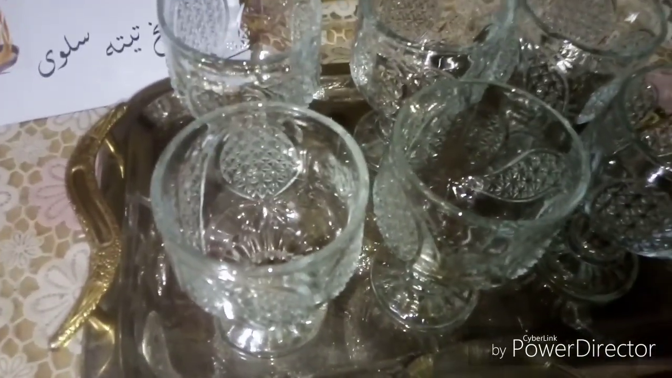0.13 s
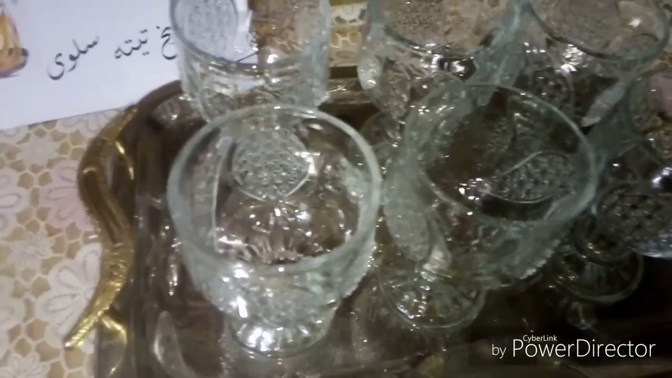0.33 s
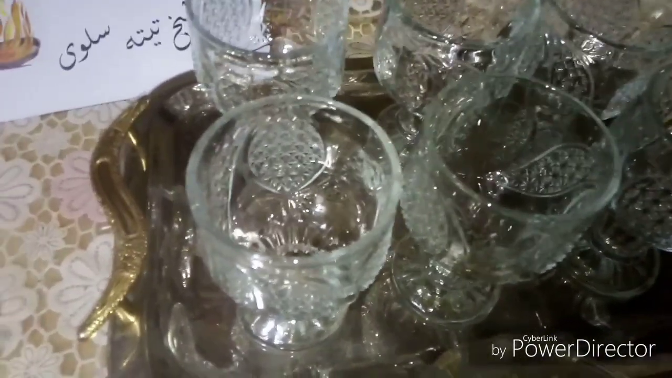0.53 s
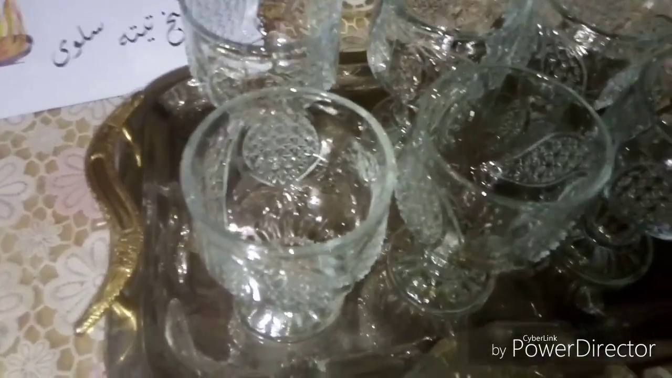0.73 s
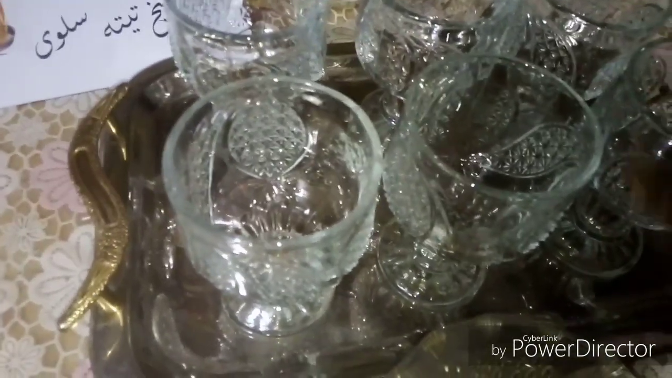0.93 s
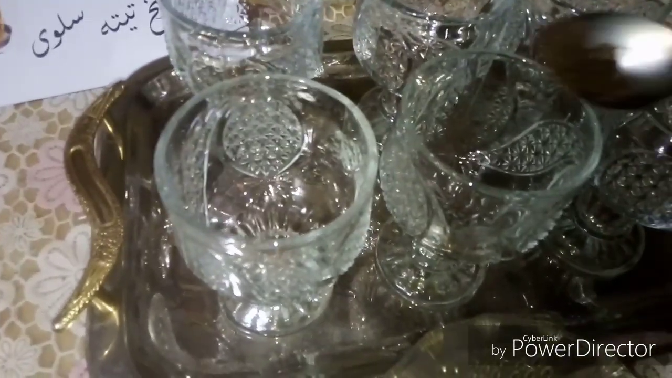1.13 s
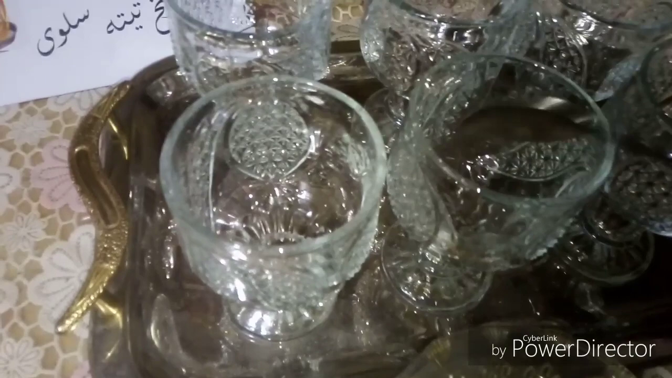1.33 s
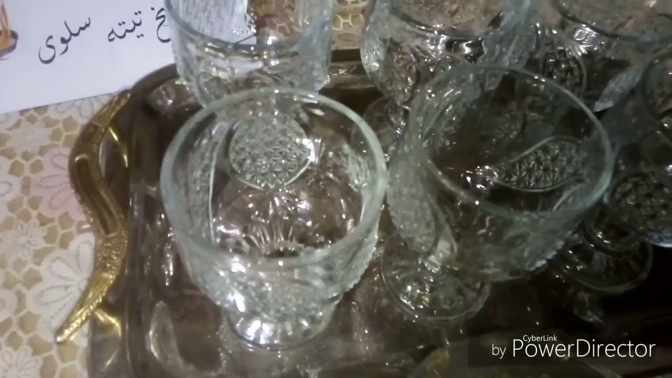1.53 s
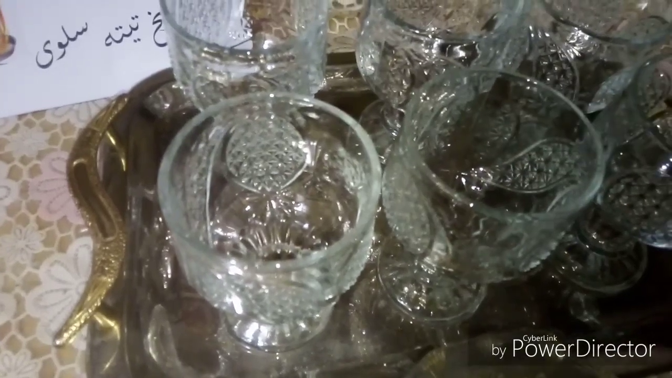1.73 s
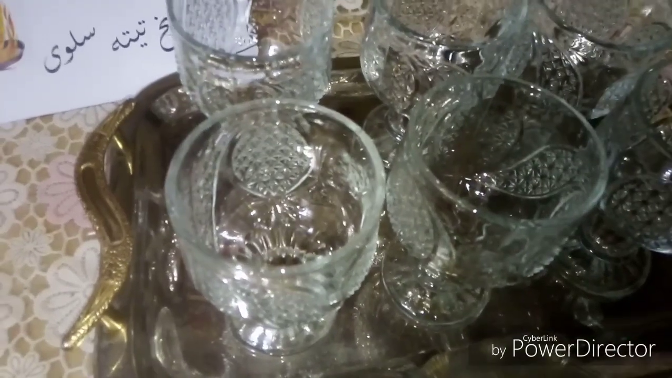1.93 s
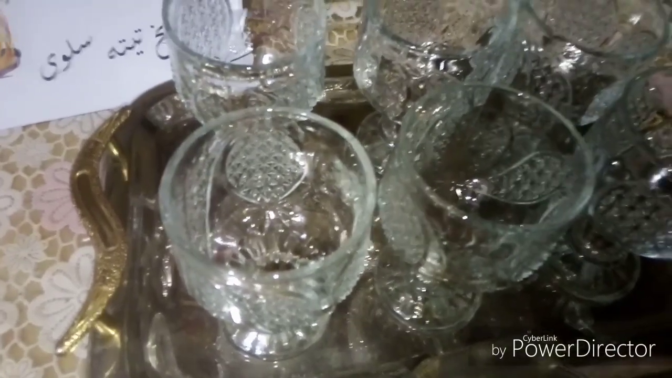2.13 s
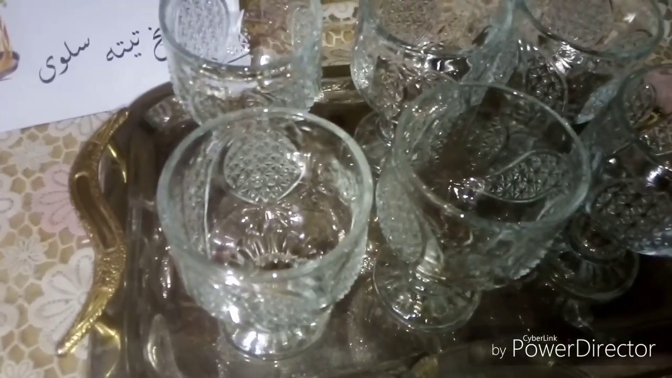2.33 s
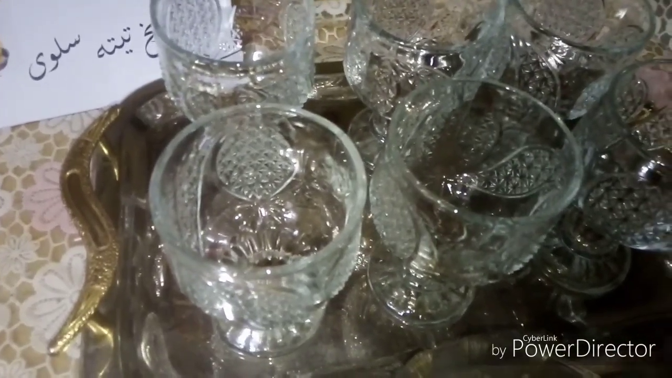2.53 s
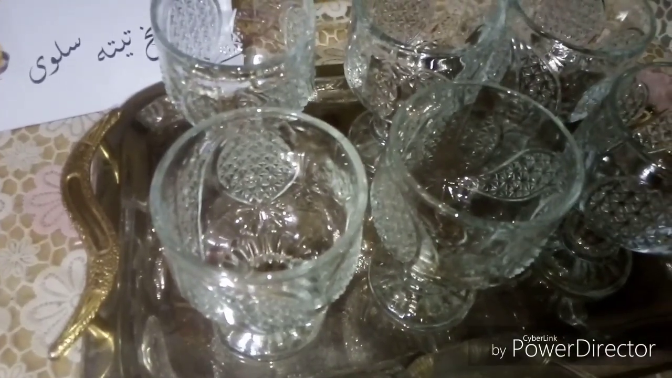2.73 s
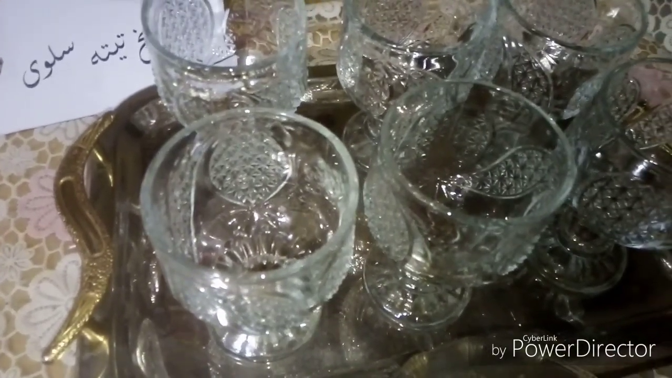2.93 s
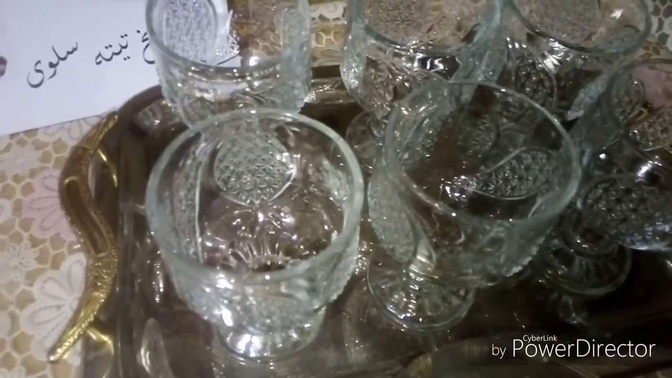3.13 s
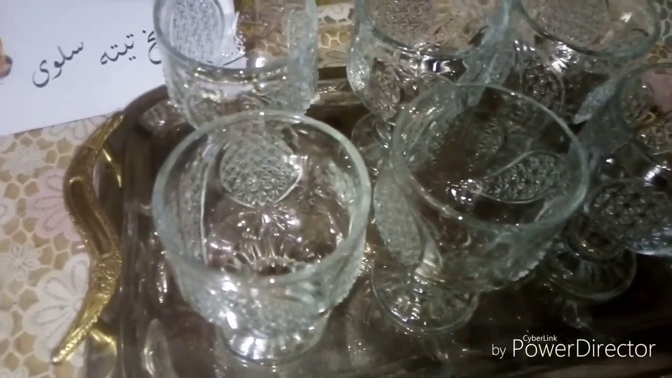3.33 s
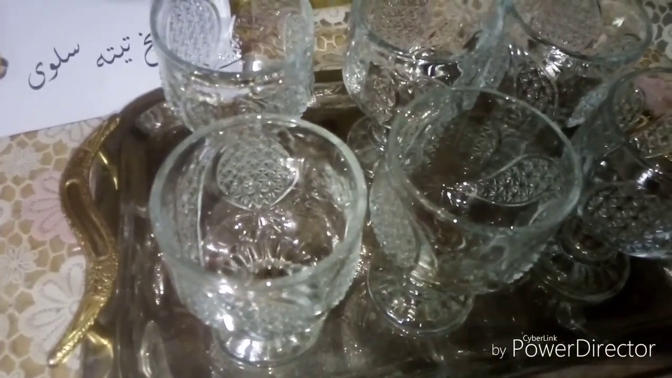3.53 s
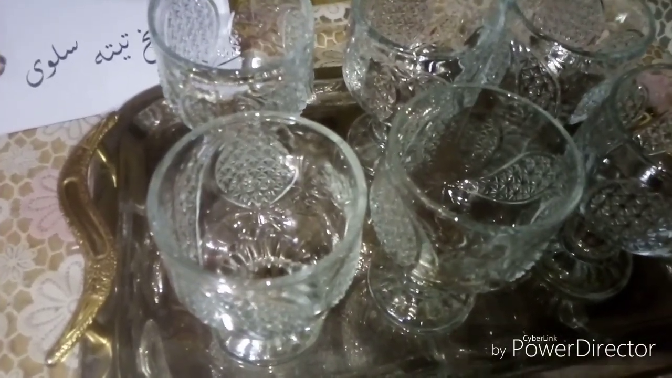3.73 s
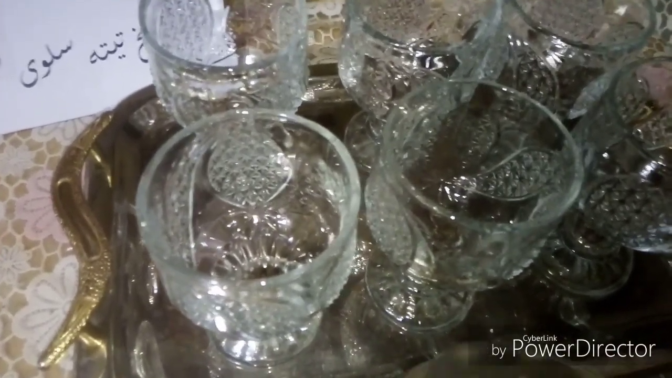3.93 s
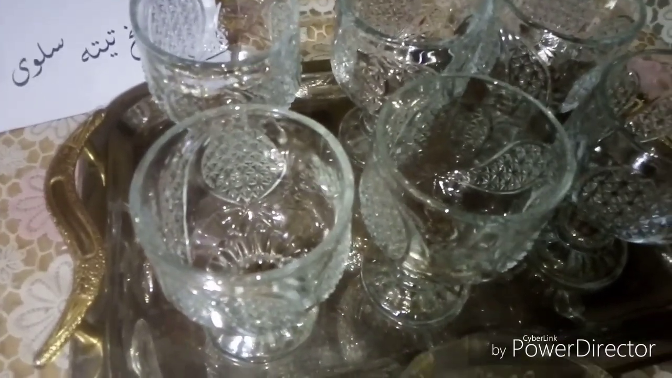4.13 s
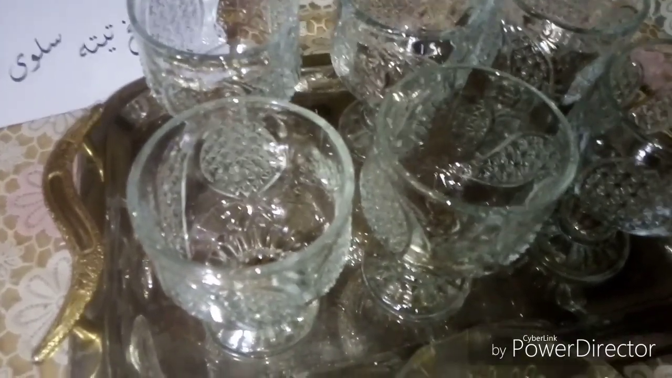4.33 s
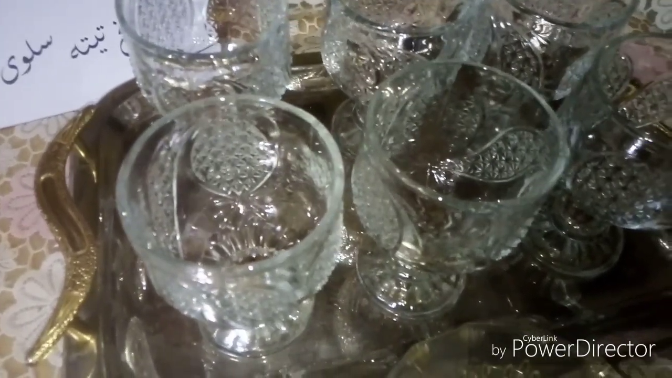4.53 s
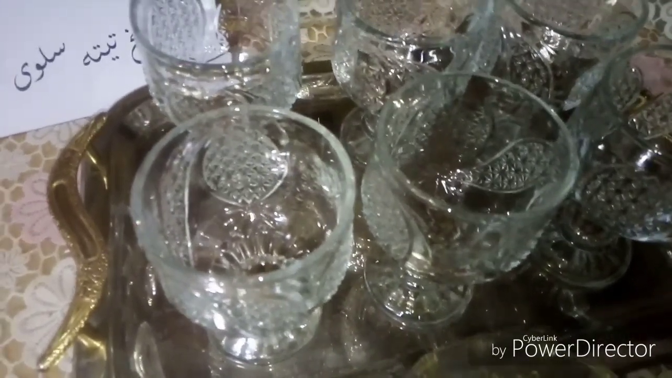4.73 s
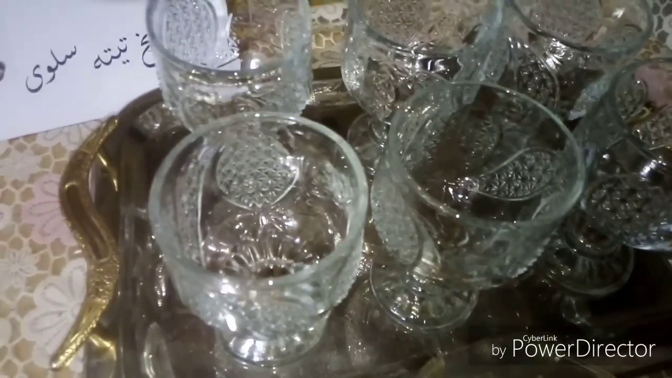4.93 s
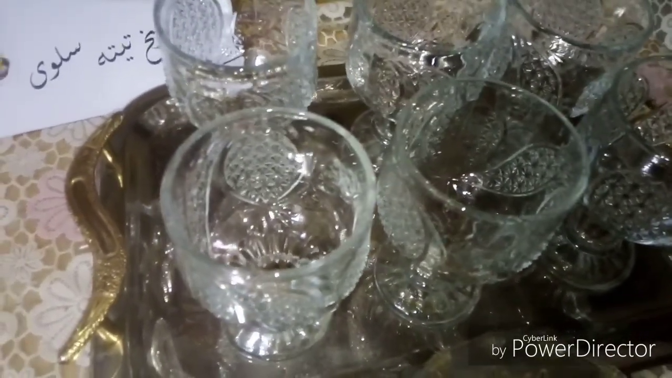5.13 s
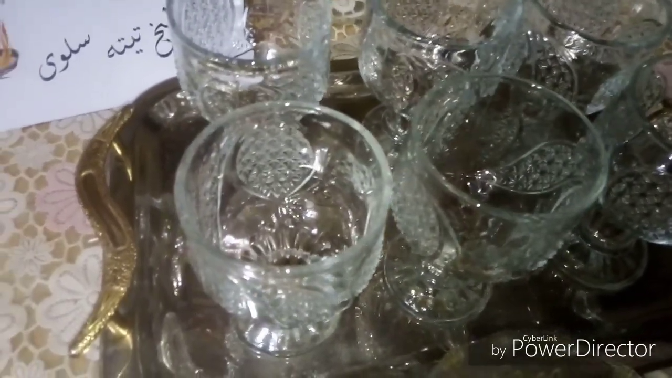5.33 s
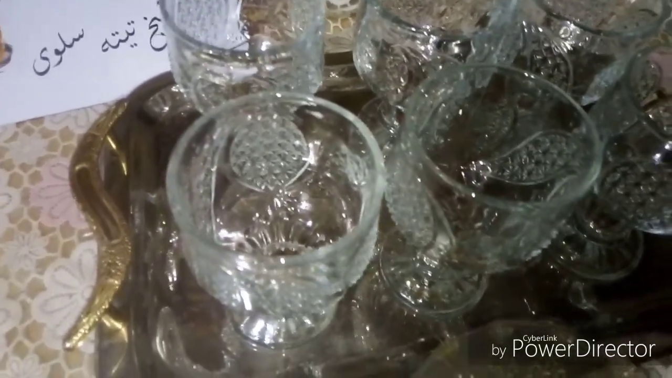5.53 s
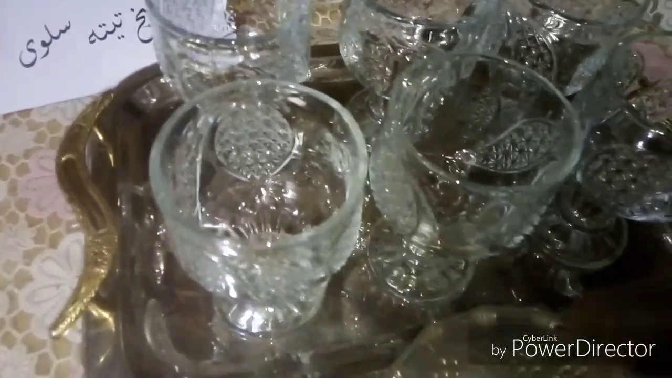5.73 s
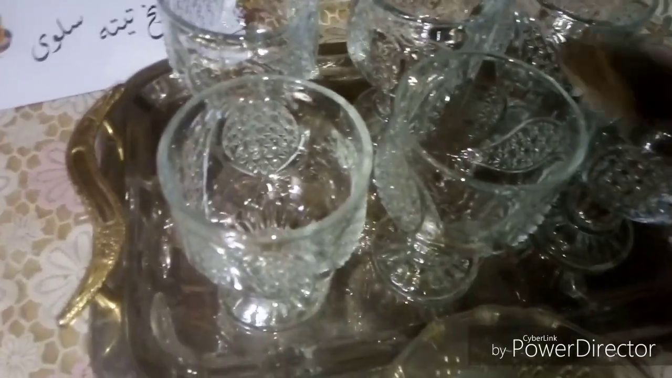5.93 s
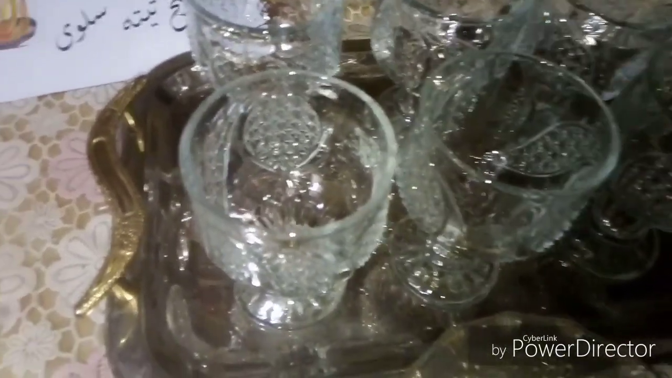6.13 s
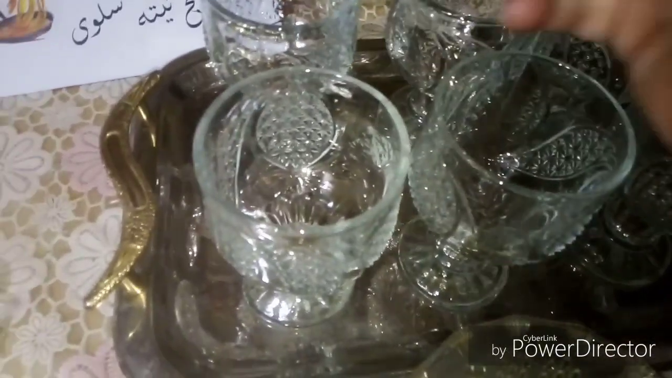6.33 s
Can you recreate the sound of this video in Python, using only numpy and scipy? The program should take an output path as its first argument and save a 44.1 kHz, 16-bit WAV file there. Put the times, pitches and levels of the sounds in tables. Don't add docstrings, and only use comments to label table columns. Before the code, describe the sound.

A small quiet kitchen, miked within a hand's reach, with low lumpy hum, soft uneven hiss and, in the first two seconds, a barely audible high throbbing whine. From 0 to 0.3 s a spoon scrapes faintly through crumbs, with tiny pings. At 1.2 s it clinks on a glass cup with a quick bounce, a clear high beating ring and a small tray thud. A light bowl tap comes at 1.87 s, then brighter, shorter clinks at 2.16, 2.2 and 2.27 s. A dry crumb snaps at 2.7 s. Three loud, hollow knocks on the wooden table fall at 3.44, 3.62 and 3.76 s, the last softest. At 3.93 to 4.05 s the spoon lands on a tray with a dull clack and metallic chatter. A strong bowl clink rings at 4.68 s, then a lighter touch and crunchy scraping from 4.86 to 5.2 s. Small snaps at 5.27 and 5.56 s fade into room tone.

```python
import sys
import numpy as np
from scipy import signal
from scipy.io import wavfile
from scipy.ndimage import uniform_filter1d

SR = 44100
rng = np.random.default_rng(int(sys.argv[2]) if len(sys.argv) > 2 else 0)


def convert_level_to_amplitude(level_db):
    exponent = np.asarray(level_db, float) / 20
    return 10 ** exponent


def file_out(sig):
    cols = np.atleast_2d(sig).T
    lim = np.clip(cols, -1, 1)
    pcm = np.round(lim * 32767).astype(np.int16)
    wavfile.write(sys.argv[1], SR, pcm)


N = 282240

# (frequency [Hz], level [dB])
HUM_COLOUR = [(18, -48.5), (30, -29.5), (70, -43), (92, 2), (156, 10.5), (231, -48), (271, -3), (367, -20),
              (392, -1), (424, -18.5), (700, -16), (910, -25), (1540, -120)]
# (frequency [Hz], level [dB])
HISS_COLOUR = [(410, -41), (700, -23.5), (993, -11.5), (1090, -9.5), (1190, -12), (1320, -9.5), (2050, -15),
               (2690, -10.5), (3070, -11.5), (3580, -15), (5020, -21), (6340, -16), (7900, -35),
               (15500, -42)]
# (time [s], length [s], pitch [Hz], level [dB], throbs [1/s])
WHINES = [
    (.34, .23, 5925, -66, 6.5),
    (.64, .16, 5842, -63, 13.5),
    (.775, .42, 5820, -62, 13.5),
    (1.35, .55, 5820, -55, 5.5),
]
# (delay [s], level [dB])
WALL_ECHOES = [(.0040, -7), (.0072, -13), (.0115, -19)]
# (frequency [Hz], t60 [s])
KITCHEN_T60 = [(200, .28), (1000, .28), (3000, .28), (6000, .26), (12000, .17)]
# (frequency [Hz], level [dB])
MICROPHONE = [(20, -12), (60, -3), (100, 0), (15500, 0), (15900, -18), (17000, -24)]

# (time [s], level [dB], pitch [Hz])
PINGS = [(.062, -43, 2300), (0.157, -36, 5450), (0.171, -53, 5450), (0.224, -54, 2000), (.490, -70, 10300),
         (3.152, -54.5, 5440), (3.268, -57.5, 5670), (4.362, -57.5, 896)]
# (time [s], level [dB], pitch [Hz])
SNAPS = [(2.706, -42, 3100), (3.224, -52, 6000), (4.184, -46, 5300), (4.408, -56, 8300), (4.921, -52, 9400),
         (5.268, -39, 4000), (5.561, -31.5, 4170)]
# (time [s], level [dB], pitch [Hz], t60 [s])
THUDS = [
    (1.2, -31, 974, .05),
    (1.202, -44.5, 359, .05),
    (2.204, -49, 420, .1),
    (3.945, -32, 600, .04),
    (4.001, -39, 141, .2),
]
# (time [s], level [dB], chatter loss per contact [dB], t60 [s])
LANDINGS = [
    (3.9275, -30, 16, 0.09),
    (3.943, -22.5, 7.5, 0.069),
    (3.993, -46, 6.5, .04),
    (4.006, -34.5, 2, 0.068),
]
# (frequency [Hz], width [Hz], level [dB], t60 [s])
SPOON_MODES = [(2082, 140, -2, 0.068), (3150, 430, -11, 0.12), (10300, 120, -35, 0.082),
               (10200, 19000, -25, 0.017), (15300, 800, -31, .03)]
# (time [s], length [s], pressure [dB], ring of the bowl [dB])
STROKES = [
    [(0, .055, -60, 3), (.055, .07, -59, 3), (.115, .155, -50, -12), (2.125, .06, -58, 6)],
    [(4.855, .13, -54, -2), (4.985, .085, -51, -1), (5.07, .13, -59, -8)],
]
# (frequency [Hz], level [dB])
STROKE_COLOURS = [
    [(710, -59), (1200, -42), (1320, -47), (1620, -5), (2310, -3), (2620, -14), (3180, -1.5), (3650, -20),
     (5490, 5), (8070, -20), (8790, -18.5), (12100, -28), (15500, -51)],
    [(1470, -10.5), (2500, -10.5), (2850, -7), (4200, -11), (5530, -25.5), (6150, -3), (6740, -9),
     (7920, -24), (10400, -48), (11700, -36), (15500, -28.5)],
]

# (time [s], blow [dB], tick [dB])
KNOCKS = [
    (3.441, -6, -18),
    (3.621, -6.5, -24),
    (3.759, -9, -32.5),
]
# (frequency [Hz], level [dB], t60 [s])
BOARD_MODES = [(119, 9, 0.1), (146, -7, 0.28), (318, 16, 0.05), (395, -15, 0.22), (530, 9, 0.083),
               (740, 4.5, 0.06), (956, -2, 0.27), (903, -23, .1), (1154, 0, .12), (1160, -46, .12),
               (1400, -27.5, .1), (1550, -20.5, 0.15), (1960, -17, 0.36), (2385, -1, .09)]
# (delay [s], level [dB])
TABLE_ECHOES = [(.0026, -4), (.0041, -12), (.0049, -12), (.0069, -12), (.0090, -13), (.0113, -11),
                (.0184, -16)]
# (frequency [Hz], level [dB])
RATTLE_COLOUR = [(50, -36), (90, -16), (150, -1), (320, -1.5), (700, 4), (900, 1), (1400, -4), (2300, -15),
                 (3000, -28), (6000, -32), (8000, -55), (12000, -90)]

# (time [s], blow [dB], crack [dB], damping factor [1])
CUP_HITS = [
    (1.2017, -18.5, 7, 0.82),
    (1.2078, -25.5, 13, 1.2),
]
# (frequency [Hz], level [dB], t60 [s])
CUP_MODES = [(2804, -3, .40), (2811, -5.5, .30), (6446, -6, .24), (6451, -9, .19), (3628, -30, .1),
             (5690, -24, .06), (6180, -28, .1), (7289, -26, .1), (11140, -33, .09), (13820, -24, .03)]
# (time [s], blow [dB], low modes [dB], high modes [dB], crack [dB])
BOWL_HITS = [
    [(2.1634, -15.5, -17.5, -24.5, -9.5), (4.6838, -10.5, -14, -28, -1.5), (4.8764, -32.5, -13, -15, 17)],
    [(2.203, -25.5, -14.5, -16.5, 11.5), (2.2727, -15.5, -17, -8, 8.5)],
    [(1.872, -29, -23, -25, 2.5), (2.116, -54, -15, -6, -3), (5.2795, -44, -8.5, -17.5, 3.5)],
]
# (lean to the modes of positive side [dB], damping factor [1])
BOWL_SPOTS = [(12, 1.25), (-6, 1.15), (-1.5, 2.2)]
BOWL_HZ = [2309, 2332, 4570, 5150, 5278, 5335, 5378, 5420, 5480, 5776, 8050, 10290, 10545, 13350]
# (level [dB], t60 [s], side: half of it times the spot's lean is added to the level [1])
BOWL_MODES = [(6, .22, -1), (-6, .1, 1), (-22, .1, .1), (-17, .1, .1), (-15, .07, -1), (-9, .13, 1.1),
              (-4, .18, -1.8), (-4, .13, 1.1), (-5, .035, .4), (-18, .08, .1), (-2, .12, .7),
              (-5, .08, -.4), (-3, .11, -.6), (-8, .06, .1)]
# (delay [s], level [dB])
REBOUND = [(.0039, -4)]
# (frequency [Hz], level [dB])
CRACK_COLOUR = [(800, -50), (1400, -15), (2300, -9), (4100, -14), (5500, 0), (6800, -6), (7800, -22),
                (9500, -28), (10500, -24), (11700, -36), (13400, -25), (15500, -25)]


def evened(x):
    return x / np.sqrt(np.mean(x ** 2) + 1e-20)


def read(points, hz):
    f, value = np.transpose(points)
    return np.interp(np.log(hz + 1), np.log(f + 1), value)


def add(mix, s, sound):
    part = mix[round(s * SR):][:len(sound)]
    part += sound[:len(part)]


def coloured(x, points):
    hz = abs(np.fft.fftfreq(4096, 1 / SR))
    log_gain = np.log(convert_level_to_amplitude(np.maximum(read(points, hz), -100)))
    taps = np.fft.ifft(np.exp(signal.hilbert(log_gain).conj())).real[:2048]
    return signal.oaconvolve(x, taps)[:len(x)]


def resonate(x, hz, width_hz):
    turn = np.exp(2j * np.pi * np.cumsum(hz * np.ones(len(x))) / SR)
    r = np.exp(-np.pi * width_hz / SR)
    return 2 * (turn * signal.lfilter([1 - r], [1, -r], x / turn)).real


def ring(modes, damping, seconds=1.0, rise=0.0006):
    t = np.arange(round(seconds * SR)) / SR
    sines = sum(convert_level_to_amplitude(db - 60 * t * damping / t60) * np.sin(2 * np.pi * hz * t) for hz, db, t60 in modes)
    return sines * (1 - np.exp(-(t / rise) ** 2))


def bowl_modes(low_db, high_db, lean_db=0.):
    modes = []
    for hz, (db, t60, side) in zip(BOWL_HZ, BOWL_MODES):
        db = db + .5 * side * lean_db + low_db * (hz < 3e3) + high_db * (hz > 7e3)
        modes.append((hz, db, t60))
    return modes


def crack(db, t60=0.011, dull_db=0.):
    t = np.arange(SR // 10) / SR
    colour = [(hz, d + dull_db * (hz > 7500)) for hz, d in CRACK_COLOUR]
    envelope = convert_level_to_amplitude(-60 * t / t60) * np.minimum(t / 0.0013, 1)
    burst = coloured(rng.standard_normal(len(t)) * envelope, colour)
    return convert_level_to_amplitude(db) * burst / abs(burst).max()


def touch(db, hz, width_hz, t60):
    t = np.arange(SR // 4) / SR
    top = hz + width_hz / 2
    bottom = hz * hz / top
    band = [(20, -90), (bottom * .6, -30), (bottom, -8), (hz, 0), (top, -8), (top * 1.15, -40), (top * 2, -70)]
    envelope = convert_level_to_amplitude(-60 * t / t60) * np.minimum(t / .0005, 1)
    burst = coloured(rng.standard_normal(len(t)) * envelope, band)
    return convert_level_to_amplitude(db) * burst / abs(burst).max()


def echoes(x, table):
    out = x.copy()
    for delay, db in table:
        add(out, delay, convert_level_to_amplitude(db) * x)
    return out


def tail(t60_factor):
    hz, t, z = signal.stft(rng.standard_normal(SR), SR, nperseg=128)
    decay = convert_level_to_amplitude(-60 * t / (t60_factor * read(KITCHEN_T60, hz)[:, None]))
    taps = signal.istft(z * decay, SR, nperseg=128)[1]
    taps *= np.minimum(np.arange(len(taps)) / (0.021 * SR), 1)
    return taps / np.linalg.norm(taps)


def room_floor():
    hz = np.fft.rfftfreq(1024, 1 / SR)
    a, b, blips, patches = rng.standard_normal((N // 256 + 5, 513, 4)).T
    blips = evened(uniform_filter1d(uniform_filter1d(blips, size=2, axis=0), size=8, axis=1))
    patches = evened(uniform_filter1d(uniform_filter1d(patches, size=24, axis=0), size=40, axis=1))
    treated = np.clip((7600 - hz[:, None]) / 600, .15, 1)
    out = np.zeros(N)
    for colour, db, blip_db, patchy_db in [(HUM_COLOUR, -56, 3.5, .6), (HISS_COLOUR, -65.5, 4.5, 2.2)]:
        field_db = read(colour, hz)[:, None] + treated * (blip_db * blips + patchy_db * patches)
        noise = signal.istft((a + 1j * b) * convert_level_to_amplitude(field_db), nperseg=1024, noverlap=768)[1][:N]
        out += convert_level_to_amplitude(db) * evened(noise)
    return out


def whine():
    throb_depth, sag_hz_per_s, swell_s = .5, -15, .06
    out, t = np.zeros(N), np.arange(SR) / SR
    for s, length, start_hz, db, throbs in WHINES:
        hz = start_hz + sag_hz_per_s * t
        throb = 1 + throb_depth * np.sin(2 * np.pi * throbs * t)
        tone = np.sqrt(2) * np.sin(2 * np.pi * np.cumsum(hz) / SR) * throb
        fuzz = evened(resonate(rng.standard_normal(len(t)), hz, 33))
        swell = np.clip(np.minimum(t, length - t) / swell_s, 0, 1)
        add(out, s, convert_level_to_amplitude(db) * (0.65 * tone + 0.3 * fuzz) * swell)
    return out


def crumbs_and_tray():
    out = np.zeros(N)
    for s, db, hz in PINGS:
        add(out, s, touch(db, hz, width_hz=150, t60=.08))
    for s, db, hz in SNAPS:
        add(out, s, touch(db, hz, width_hz=1.1 * hz, t60=.011))
    for s, db, hz, t60 in THUDS:
        add(out, s, touch(db, hz, 1.5 * hz, t60))
    return out


def spoon_laid_down():
    chatter_s, slowing = .0045, 1.3
    out = np.zeros(N)
    for s, db, loss_db, t60 in LANDINGS:
        for hz, width_hz, mode_db, mode_t60 in SPOON_MODES:
            add(out, s, touch(db + mode_db, hz, width_hz, mode_t60))
        for k in range(6):
            late = chatter_s * (slowing ** k - 1) / (slowing - 1)
            add(out, s + late, touch(db - k * loss_db, 2600, 7500, t60))
    return out


def strokes():
    peak_share, roundness = .4, .7
    out = np.zeros(N)
    bowl = ring(bowl_modes(-8, -16), 1.8, seconds=.2)
    bowl = bowl / np.linalg.norm(bowl)
    for rows, colour in zip(STROKES, STROKE_COLOURS):
        for s, length, pressure_db, ring_db in rows:
            u = np.arange(SR // 4) / SR / length
            pressure = convert_level_to_amplitude(pressure_db) * np.interp(u, [0, peak_share, 1], [0, 1, 0]) ** roundness
            sizes = convert_level_to_amplitude(2.5 * np.minimum(rng.exponential(1, len(u) // 90 + 1), 4))
            sizes = sizes.repeat(90)[:len(u)]
            grains = evened(rng.standard_normal(len(u)) * sizes)
            add(out, s, pressure * evened(coloured(grains, colour)))
            add(out, s, signal.oaconvolve(grains * pressure * convert_level_to_amplitude(ring_db), bowl))
    return out


def knocks():
    blows, ticks = np.zeros(N), np.zeros(N)
    for s, db, tick_db in KNOCKS:
        blows[round((s + .0020) * SR)] = convert_level_to_amplitude(db)
        add(ticks, s, crack(db + tick_db, t60=0.002, dull_db=-9.5))
        add(ticks, s + .0026, crack(db + tick_db + 1, t60=.02, dull_db=-16))
    u = np.arange(500) / SR - .0014
    pulse = np.exp(-np.where(u < 0, (u / .0005) ** 2, (u / .0006) ** 2))
    thump = np.cos(2 * np.pi * 1100 * u - 1.1) * pulse
    direct = echoes(signal.oaconvolve(blows, thump)[:N], TABLE_ECHOES)
    board = signal.oaconvolve(blows, ring(BOARD_MODES, 0.97, seconds=0.57, rise=0.0022))[:N]
    rattle = coloured(tail(0.68), RATTLE_COLOUR)
    rattle = signal.oaconvolve(blows, rattle / abs(rattle).max())[:N]
    return convert_level_to_amplitude(-1.0) * direct + convert_level_to_amplitude(-27) * board + convert_level_to_amplitude(-12.5) * rattle + ticks


def glass():
    rings, cracks = np.zeros(N), np.zeros(N)
    for s, db, crack_db, damping in CUP_HITS:
        add(rings, s, convert_level_to_amplitude(db) * ring(CUP_MODES, damping, rise=.002))
        add(cracks, s, crack(db + crack_db))
    for hits, (lean_db, damping) in zip(BOWL_HITS, BOWL_SPOTS):
        for s, db, low_db, high_db, crack_db in hits:
            held = 1.55 if 2.15 < s < 2.25 else 1
            struck = ring(bowl_modes(low_db, high_db, lean_db), damping * held)
            add(rings, s, convert_level_to_amplitude(db - 2) * echoes(struck, REBOUND))
            add(cracks, s, crack(db + crack_db))
    return rings, cracks


def scene():
    background = room_floor() + whine()
    small = crumbs_and_tray() + spoon_laid_down() + strokes()
    rings, cracks = glass()
    sent = convert_level_to_amplitude(-11) * rings + convert_level_to_amplitude(-13) * cracks + convert_level_to_amplitude(-9) * small
    wet = signal.oaconvolve(sent, tail(1))[:N]
    return (background + small + knocks() + rings + echoes(cracks, WALL_ECHOES) + wet)[None]


def roll_off(x):
    return signal.sosfilt(signal.butter(12, 17150, fs=SR, output="sos"), x)


def record(dry):
    knee, ceiling = .4, .66
    room = ceiling - knee
    over = np.maximum(abs(dry[0]) - knee, 0)
    squeezed = dry[0] - np.sign(dry[0]) * (over - room * np.tanh(over / room))
    finished = coloured(squeezed, MICROPHONE)[None]
    return roll_off(finished)


dry = scene()
out = record(dry)
file_out(out)
```